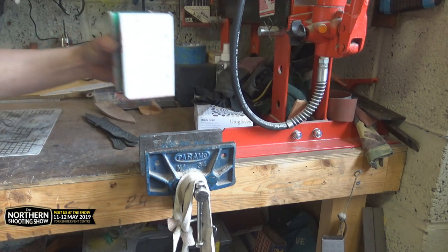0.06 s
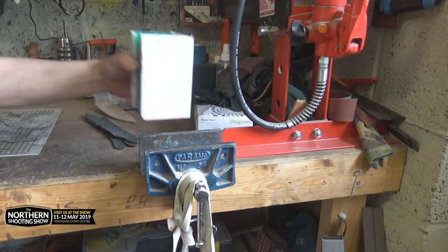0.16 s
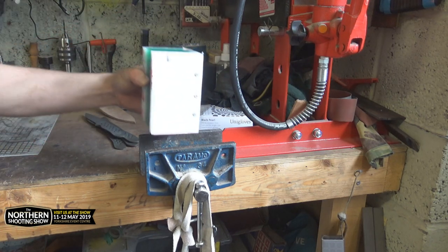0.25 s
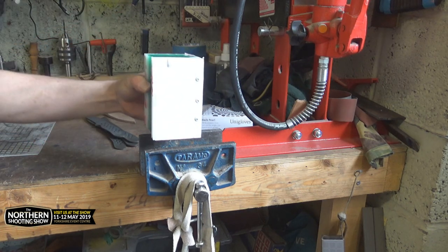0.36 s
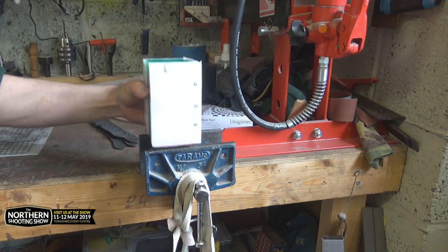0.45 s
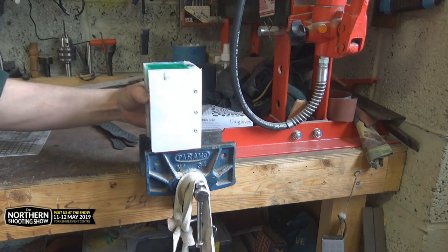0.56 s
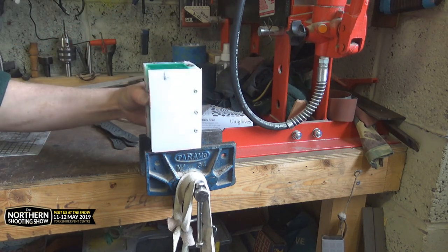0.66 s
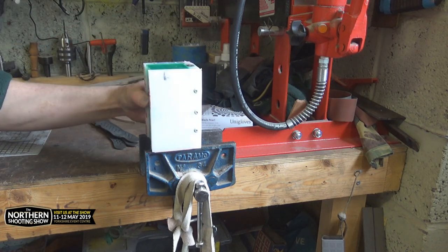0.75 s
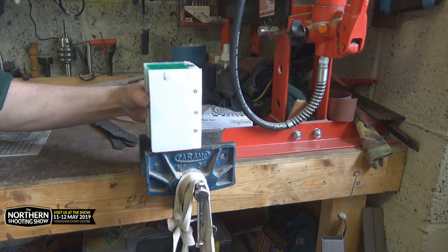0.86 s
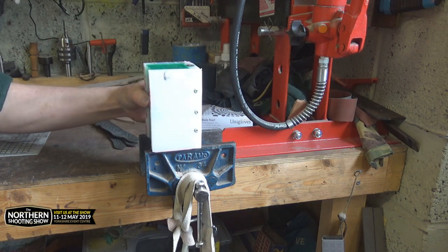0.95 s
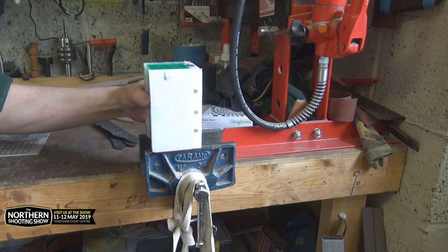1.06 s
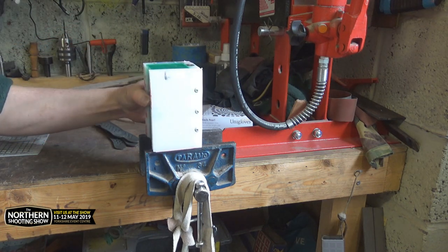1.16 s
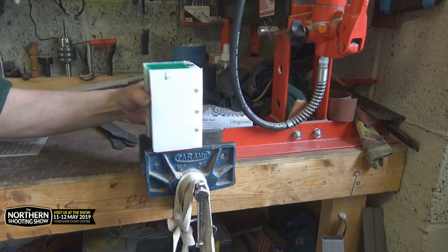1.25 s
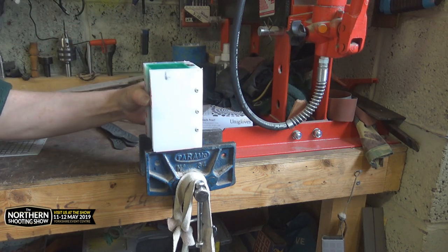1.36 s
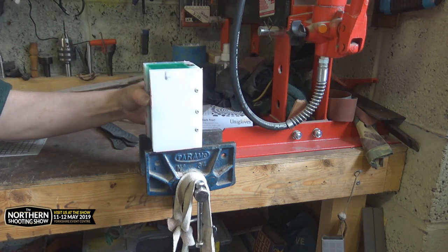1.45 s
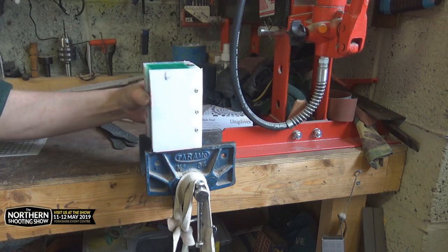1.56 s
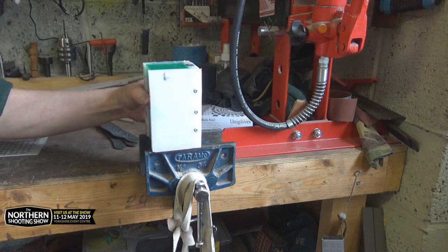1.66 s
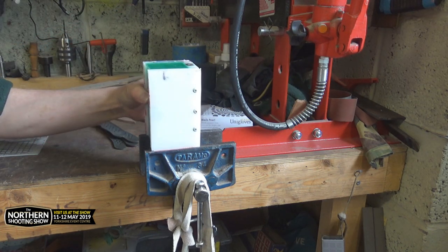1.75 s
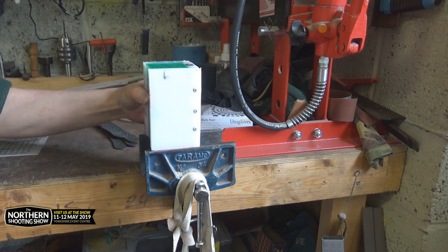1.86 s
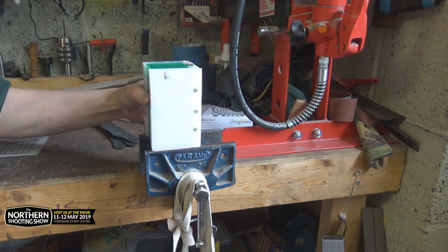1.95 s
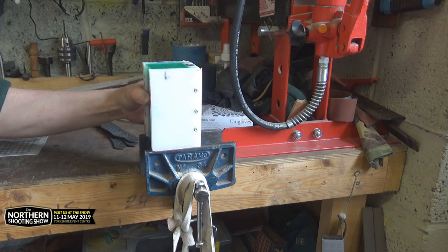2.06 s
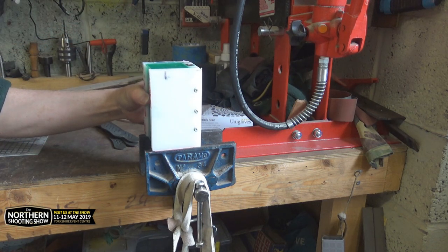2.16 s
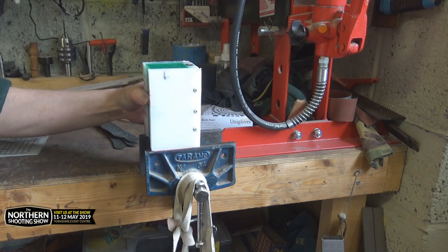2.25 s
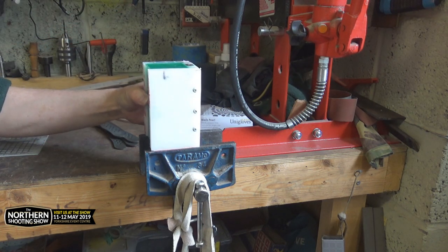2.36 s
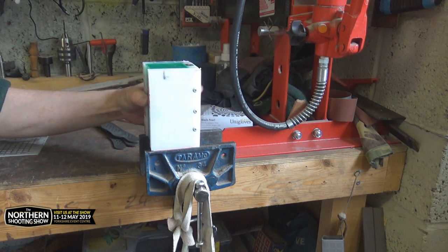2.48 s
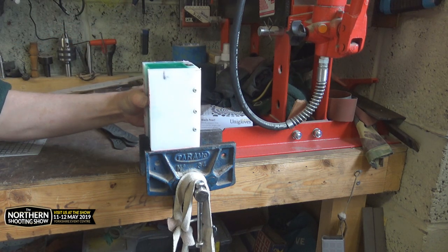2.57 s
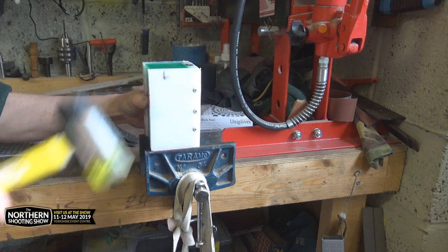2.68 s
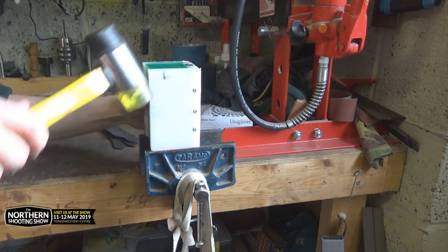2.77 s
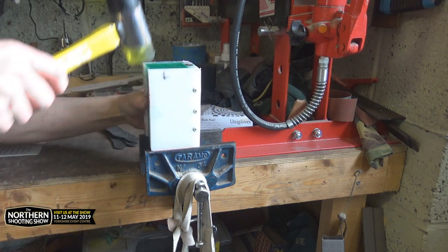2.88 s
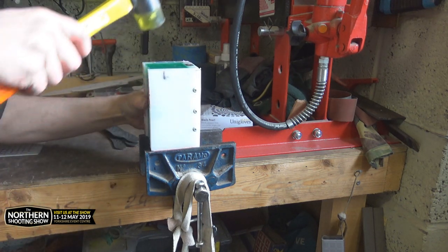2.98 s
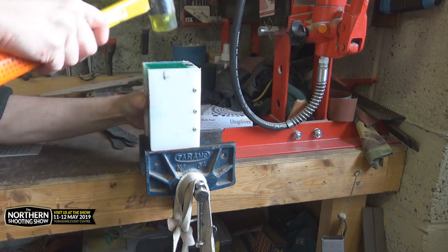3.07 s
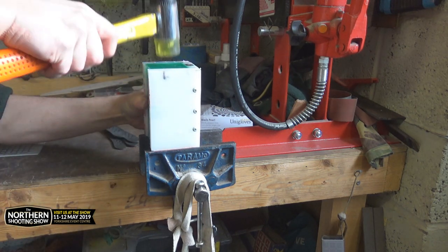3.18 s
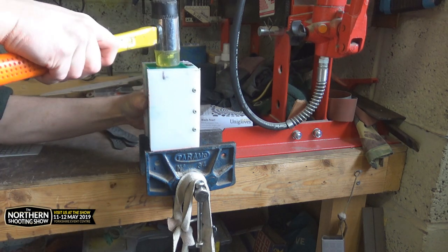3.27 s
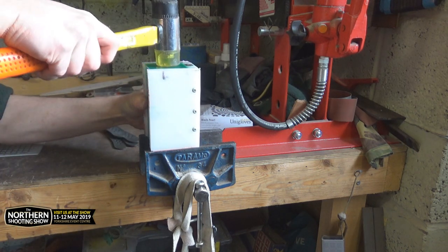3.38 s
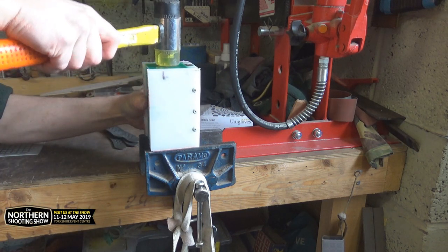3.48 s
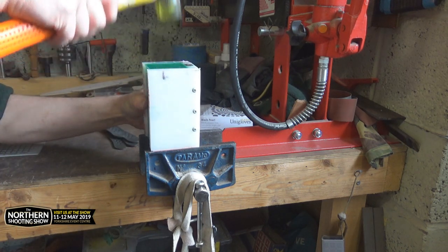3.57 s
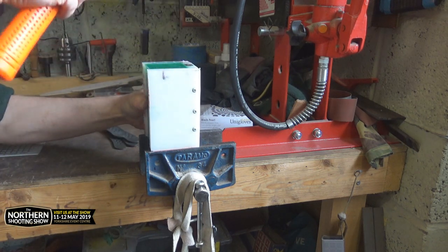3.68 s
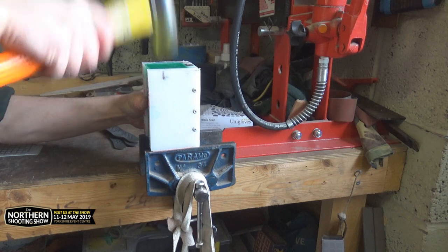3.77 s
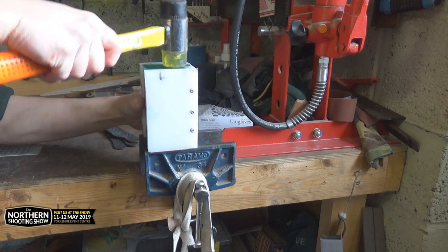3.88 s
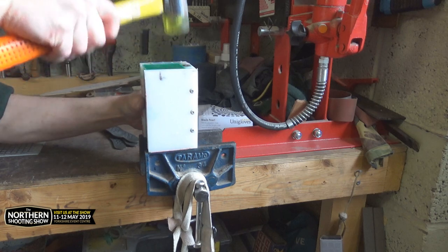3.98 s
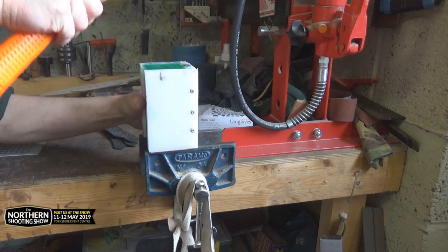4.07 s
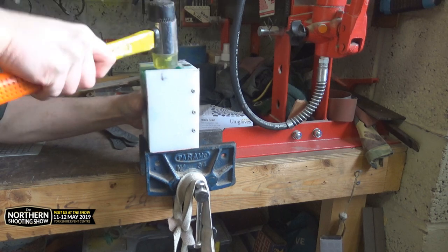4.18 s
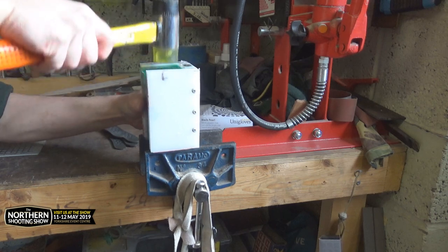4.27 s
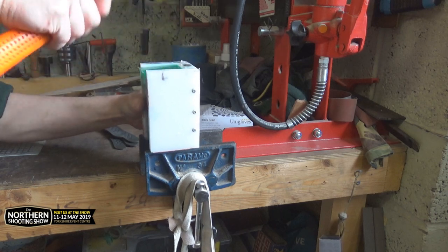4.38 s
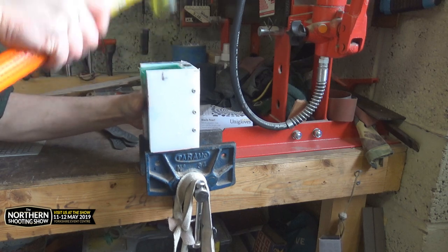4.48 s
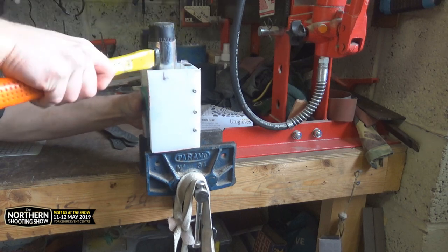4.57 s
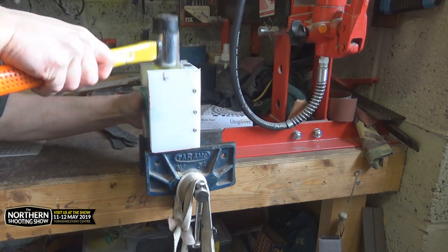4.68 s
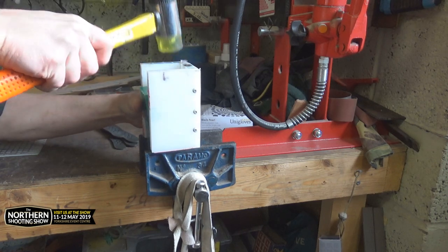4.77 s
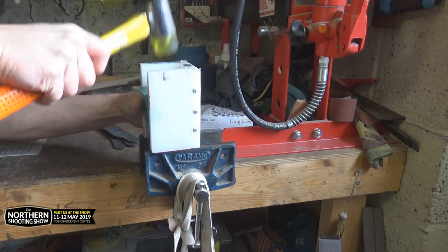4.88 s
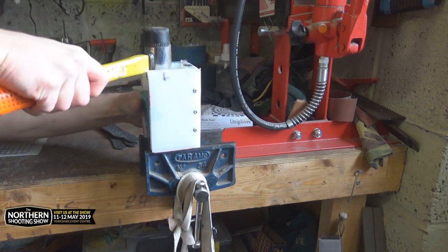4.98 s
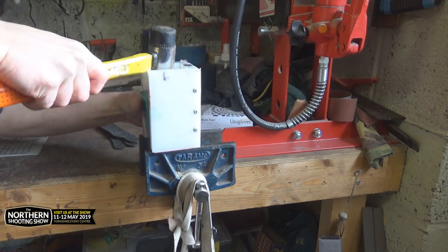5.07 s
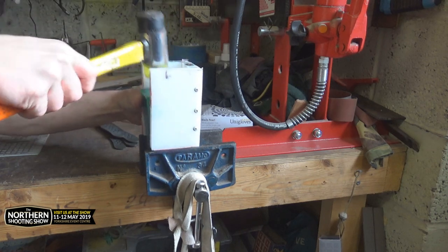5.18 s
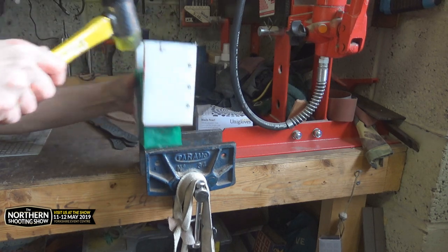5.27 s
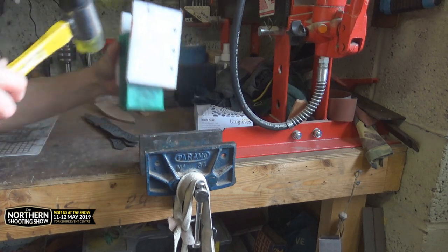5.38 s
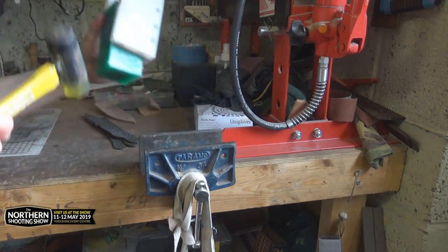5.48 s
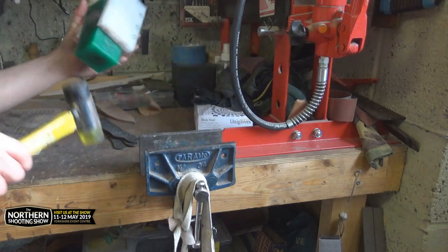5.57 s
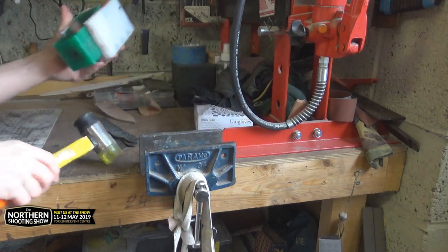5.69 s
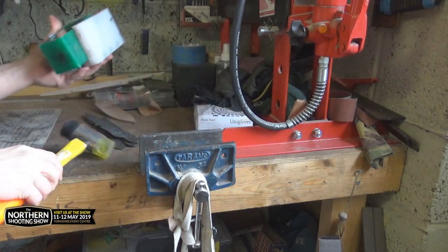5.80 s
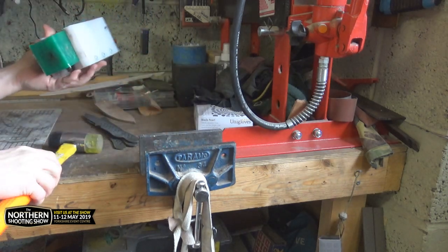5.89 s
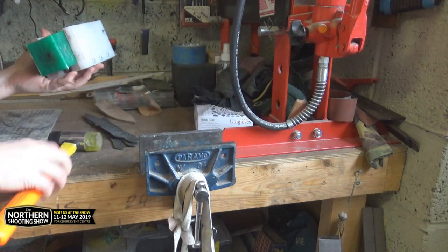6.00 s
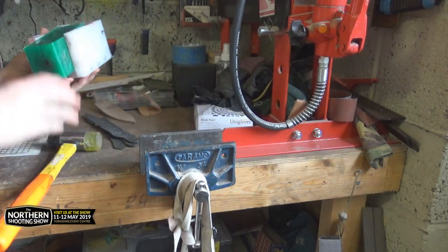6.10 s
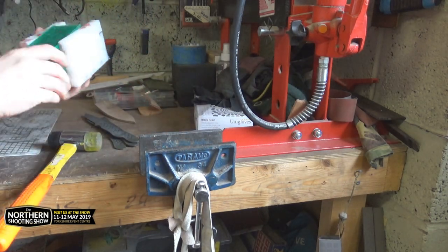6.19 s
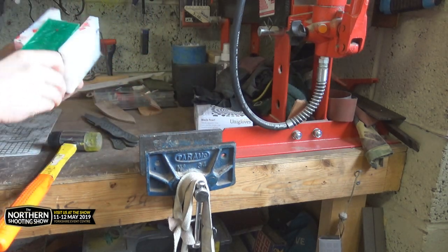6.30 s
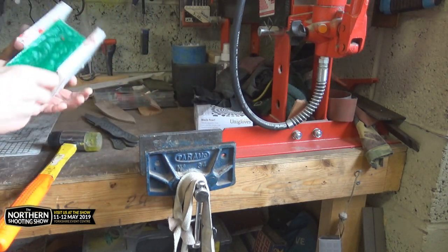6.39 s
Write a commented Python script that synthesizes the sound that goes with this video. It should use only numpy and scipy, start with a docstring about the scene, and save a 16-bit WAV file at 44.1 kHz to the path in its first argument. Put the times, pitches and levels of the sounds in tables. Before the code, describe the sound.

A mallet cracks five times against a plastic mould on clinking steel vice jaws, then clatters onto a workshop bench.

```python
"""Over room tone, hands rub a plastic mould and set it on a bench vice; a camera lens starts ticking faintly.
From 3.3 s a mallet strikes five times: the mould cracks and rings, the steel jaws clink on the first
three blows, and a limiter holds the hardest peaks down. The cast resin block slides out.
Mould and block bump as they are lifted; last, the mallet drops on the wooden bench.
The small workshop rings after each knock."""
import sys
import numpy as np
from scipy import signal
from scipy.fft import rfft, irfft
from scipy.io import wavfile
from scipy.ndimage import uniform_filter1d, minimum_filter1d

SR = 44100
rng = np.random.default_rng(int(sys.argv[2]) if len(sys.argv) > 2 else 0)


def persist_wave(psi):
    """Save psi, clipped to +-1, as 16-bit WAV."""
    counts = np.round(np.clip(psi, -1, 1) * 32767).astype(np.int16)
    wavfile.write(sys.argv[1], SR, np.atleast_2d(counts).T)


N = 284004
TAIL_SAMPLES = 32768

# workshop decay: freq_hz, t60_s
ROOM_DECAY = [(100, 0.42), (320, 0.36), (840, 0.37), (2200, 0.3), (5800, 0.33), (9000, 0.28), (14000, 0.16)]
# stereo width: freq_hz, side_gain_db
STEREO_WIDTH = [(50, -14), (140, -29), (300, -16.5), (600, -11), (1100, -7), (2500, -6.5), (5000, -9),
                (9000, -9.5), (13000, -50)]
# room tone and hiss spectrum: freq_hz, relative_db
AIR_SPECTRUM = [(15, -33), (25, -9.5), (55, -8), (133, -13.5), (194, -5), (316, -6), (527, -1.5),
                (572, -0.5), (1040, 1.5), (2390, -9), (2730, -6), (2970, -7), (3300, -9.5), (4100, -10),
                (15800, -17)]
# pings of one focus step: pitch_hz, delay_s, half_length_s, relative_db
FOCUS_PINGS = [(2746, 0.00077, 0.0018, -1), (3334, 0.004, 0.0031, -2), (3870, 0.002, 0.00075, -3.5)]
# upper pings against the lowest: time_s, tilt_db
PING_TILT = [(0.8, -3), (1.9, 7), (3.3, -2), (4.0, -5), (6.0, -3)]
# hands on mould and handle: start_s, length_s, level_db
HAND_RUBS = [(0.0, 0.2, -59), (0.388, 0.14, -60), (1.757, 0.036, -64), (2.416, 0.089, -64),
             (2.62, 0.31, -63.5), (5.572, 0.13, -59), (6.305, 0.045, -51)]
# skin friction spectrum: freq_hz, relative_db
RUB_SPECTRUM = [(500, -14), (1500, 0), (3000, -2), (6500, -1), (9500, -2), (15000, -35)]
# short resonances: start_s, level_db, centre_hz, half_width_hz
SHORT_RESONANCES = [(0.146, -69, 13000, 3000), (0.630, -32.5, 940, 254), (0.759, -61, 2970, 600),
                    (0.807, -63.5, 9800, 3500), (2.261, -68, 1920, 400), (3.349, -22, 730, 168),
                    (5.375, -43, 330, 69.6), (5.3731, -49.5, 1430, 250), (5.377, -59, 4170, 500),
                    (6.174, -37, 900, 257), (6.174, -48, 1740, 200)]
# contacts on vice and bench: start_s, force_db, bass_db, treble_db, crack_over_tail_db, ring_db
BENCH_KNOCKS = [(0.6284, -23, -2, -8.5, 8.5, -10), (1.9434, -43, 11.5, -6, 3, -4),
                (5.3055, -49.5, 5, 4.5, 9, -4), (5.3660, -49.5, -11.5, -5, 13, -17),
                (5.3747, -42, 7.5, 5.5, 7.5, -15), (5.401, -52.5, 9, 8, 10, -12),
                (5.4340, -52.5, 10, 0, 15, 0), (5.8711, -41.5, 15, -1.5, 11.5, -1.5),
                (5.9300, -41, -14, -5.5, 7.5, -25), (5.9570, -45, 5, -5.5, 13.5, -19),
                (5.9810, -41.5, 4, -0.5, 3, -3.5), (6.0186, -35, 8, -7, 12, -19),
                (6.0244, -14.5, 3, -2, -0.5, -12), (6.2070, -42.5, 17.5, -4, 16, -5),
                (6.2145, -26, 11.5, -1.5, 4.5, -7)]
# knock spectrum: freq_hz, relative_db
KNOCK_SPECTRUM = [(30, -68), (60, -47), (110, -40), (145, -14), (190, -16.5), (280, -4), (500, -3.5),
                  (700, -4), (930, -4.5), (1400, -13), (3000, -16.5), (9000, -30), (12500, -58),
                  (15500, -72)]
# wooden bench modes: pitch_hz, relative_db, t60_s
BENCH_MODES = [(153.7, -3, 0.25), (224, -13, 0.41), (254, -0.5, 0.11), (270.6, 3.5, 0.23), (319, -3, 0.23),
               (355, 3, 0.14), (411, 5, 0.36), (454, -1, 0.26), (520, 0.5, 0.28), (639, 4.5, 0.089),
               (874, -13, 0.24), (920, -33, 0.56), (1120, -28, 0.5)]
# mould rebounds on the jaws: start_s, relative_db
JAW_CLINKS = [(3.3516, -18.5), (3.934, -0.5), (4.31, -4.5), (4.313, -7)]
# damped steel resonances: centre_hz, half_width_hz, relative_db
JAW_RESONANCES = [(5680, 130, -6.5), (5880, 82, 5.5), (9550, 110, -7), (11420, 150, -2.5)]
# longest-lived steel modes: pitch_hz, relative_db, t60_s
JAW_MODES = [(5717, -3, .36), (5765, -6, .33), (5821, -3, .38), (5965, -7, .36), (6558, -7, .34),
             (9815, -10, .3)]
# mallet blows and rebounds: start_s, force_db, bass_db, treble_db, top_db, crack_over_tail_db, ring_db
MALLET_BLOWS = [(3.3485, -21, 6, -4, -2, 13, -1), (3.9258, 3, -1, 1, 3.5, -2.5, -13),
                (4.3005, 0, -6.5, -1, 4.5, 2, -13.5), (4.6486, -12, -10.5, 2, 2, 10, -21),
                (4.6725, -17, -9.5, -2, -5, 12.5, -18), (4.6790, -18, -4, -3.5, 2.5, 11, -25.5),
                (5.0580, -14.5, -11.5, -3.5, -10.5, 14, -11)]
# blow spectrum: freq_hz, relative_db
BLOW_SPECTRUM = [(21, -54.5), (50, -34), (100, -30.5), (179, -15.5), (298, -6.5), (356, -7.5), (415, -4),
                 (484, -8), (765, -3), (1340, -3.5), (2670, -10), (4330, -11.5), (4920, -13.5),
                 (5880, -11.5), (8620, -11), (15500, -45)]
# plastic mould modes: pitch_hz, relative_db, t60_s
MOULD_MODES = [(215, -15, 0.22), (254, -16.5, 0.23), (311.7, -6.5, 0.3), (410, -21, 0.36), (467, -6, 0.24),
               (522, -24, 0.66), (635, -5, .28), (692, -8, .26), (752, -2, .25), (876, -9, .28),
               (1080, -9, 0.35), (1268, -17, 0.25), (1401, -7, 0.13), (1930, -19, 0.22)]


def from_db(db):
    """Decibels to gain."""
    return 10 ** (np.asarray(db) / 20)


def at_hz(points, hz):
    """Table lookup on a log-frequency axis."""
    known_hz, values = np.transpose(points)
    return np.interp(np.log(np.maximum(hz, 1)), np.log(known_hz), values)


def bins_hz(size):
    """Frequencies of a real spectrum."""
    return np.arange(size // 2 + 1) * SR / size


def add(out, start_s, sound):
    """Mix a sound in at start_s."""
    start = round(start_s * SR)
    out[:, start:start + TAIL_SAMPLES] += sound[:, :N - start]


def shaped(x, spectrum):
    """Zero-phase filter from (freq_hz, gain_db) points."""
    size = x.shape[-1]
    return irfft(rfft(x) * from_db(at_hz(spectrum, bins_hz(size))), size)


def stereo(mid, side):
    """Mid/side to left/right, widest in the midrange."""
    side = shaped(side, STEREO_WIDTH)
    return np.array([mid + side, mid - side])


def minimum_phase(gain):
    """Causal response with this gain: nothing sounds before the contact."""
    cepstrum = irfft(np.log(gain + 1e-9))
    cepstrum[1:TAIL_SAMPLES // 2] *= 2
    cepstrum[TAIL_SAMPLES // 2 + 1:] = 0
    return np.exp(rfft(cepstrum))


def resonance(hz, centre_hz, half_width_hz):
    """Gain of a damped resonance with steep skirts."""
    return 1 / (1 + ((hz ** 2 - centre_hz ** 2) / (2 * half_width_hz * np.maximum(hz, 1))) ** 2)


def air(level_db=-60.5):
    """Steady room tone and microphone hiss."""
    mid, side = shaped(rng.standard_normal((2, N)), AIR_SPECTRUM)
    noise = stereo(mid, from_db(3.5) * side)
    return from_db(level_db) * noise / noise.std()


def reflections(build_s=0.0037):
    """Dense workshop reflections (mid, side): fast build-up, decay band by band."""
    t = np.arange(TAIL_SAMPLES) / SR
    white = rfft(rng.standard_normal((2, TAIL_SAMPLES)))
    centres_hz, t60s_s = np.transpose(ROOM_DECAY)
    out = 0
    for weights, t60_s in zip(np.eye(len(centres_hz)), t60s_s):
        band_gain = at_hz(list(zip(centres_hz, weights)), bins_hz(TAIL_SAMPLES))
        out += irfft(white * band_gain) * from_db(-60 * t / t60_s)
    return out * (1 - np.exp(-t / build_s))


def lens_ticks(start_s=0.77, step_s=0.04, level_db=-58, scatter_db=0.5):
    """The focus motor steps evenly: three tiny pings a step, the lowest first."""
    t = np.arange(N) / SR
    step, within_s = np.divmod(t - start_s + step_s / 2, step_s)
    step = step.astype(int)
    tilt_db = np.interp(t, *np.transpose(PING_TILT))
    out = 0
    for (hz, delay_s, half_length_s, db), lean in zip(FOCUS_PINGS, (-0.5, 0.5, 0.5)):
        force, detune, phase = rng.standard_normal((step[-1] + 1, 3))[step].T
        age_s = within_s - step_s / 2 - delay_s
        envelope = np.exp(-(age_s / half_length_s) ** 2)
        tone = np.sin(2 * np.pi * (hz * (1 + 0.011 * detune) * age_s + phase))
        out += from_db(level_db + db + lean * tilt_db + scatter_db * force) * envelope * tone
    return out * (step >= 0)


def hand_rubs(grains_per_s=5000, attack_s=0.05, release_s=0.049, grip_db=2.0, grip_step_s=0.03):
    """Skin sticks and slips on plastic in tiny grains; the grip varies at random."""
    grains = rng.standard_normal((2, N)) * (rng.random(N) < grains_per_s / SR)
    friction = stereo(*shaped(grains, RUB_SPECTRUM))
    t, pressure = np.arange(N) / SR, 0
    for start_s, length_s, level_db in HAND_RUBS:
        swell = np.clip((t - start_s) / attack_s, 0, 1)
        fade = np.exp(-np.maximum(t - start_s - length_s, 0) / release_s)
        pressure += from_db(level_db) * swell * fade
    grip = np.interp(t / grip_step_s, np.arange(N), rng.standard_normal(N))
    return pressure * from_db(grip_db * grip) * friction / friction.std()


def impact(room, spectrum_db, crack_db, crack_t60_s, room_share=0.43):
    """Crack of crowded, damped modes, plus reflections that partly change with the contact point."""
    t = np.arange(TAIL_SAMPLES) / SR
    mid, side = np.sqrt(room_share) * room + np.sqrt(1 - room_share) * reflections()
    crack = rng.standard_normal((2, TAIL_SAMPLES)) * from_db(crack_db - 60 * t / crack_t60_s)
    mid, side = mid + crack[0], side + from_db(-16) * crack[1]
    # spectrum_db alone sets the broad balance; fine peaks and dips stay
    power = uniform_filter1d(abs(rfft(mid)) ** 2, size=110)
    whitening = np.sqrt(power.mean() / power)
    gain = from_db(spectrum_db)
    gain /= np.sqrt(np.mean(gain ** 2))
    return irfft(rfft(stereo(mid, side)) * minimum_phase(gain * whitening))


def ring(modes, scatter_db=4.0, stereo_spread_rad=0.29, attack_s=0.0065):
    """Decaying modes of random strength, slightly out of phase between left and right."""
    t, out = np.arange(TAIL_SAMPLES) / SR, 0
    for hz, db, t60_s in modes:
        phase_rad = rng.uniform(0, 2 * np.pi) + stereo_spread_rad * rng.standard_normal((2, 1))
        envelope = from_db(db - scatter_db * rng.standard_normal() - 60 * t / t60_s)
        out += envelope * np.sin(2 * np.pi * hz * t + phase_rad)
    return out * (1 - np.exp(-t / attack_s))


def strikes(room, contacts, spectrum, modes, crack_t60_s):
    """A struck body cracks and rings; each contact's hardness tips bass and treble."""
    out, hz = np.zeros((2, N)), bins_hz(TAIL_SAMPLES)
    for start_s, force_db, bass_db, treble_db, top_db, crack_db, ring_db in contacts:
        hardness = [(220, bass_db), (700, 0.0046), (1050, 0), (1600, 0.75 * treble_db),
                    (2300, treble_db), (8500, treble_db), (12500, top_db)]
        hit = impact(room, at_hz(spectrum, hz) + at_hz(hardness, hz), crack_db, crack_t60_s)
        add(out, start_s, from_db(force_db) * (hit + from_db(ring_db) * ring(modes)))
    return out


def short_resonances(room):
    """Light taps and clicks, plus the hollow ring of the first knock and first mallet blow."""
    out, hz = np.zeros((2, N)), bins_hz(TAIL_SAMPLES)
    for start_s, level_db, centre_hz, half_width_hz in SHORT_RESONANCES:
        spectrum_db = 20 * np.log10(resonance(hz, centre_hz, half_width_hz))
        burst = impact(room, spectrum_db, crack_db=12.5, crack_t60_s=0.053)
        add(out, start_s, from_db(level_db) * burst)
    return out


def bench_knocks(room, top_over_treble_db=13.5):
    """Objects meet vice and bench; the wood rings, the top end follows contact hardness."""
    knocks = [(start_s, force_db, bass_db, treble_db, treble_db + top_over_treble_db, crack_db, ring_db)
              for start_s, force_db, bass_db, treble_db, crack_db, ring_db in BENCH_KNOCKS]
    return strikes(room, knocks, KNOCK_SPECTRUM, BENCH_MODES, crack_t60_s=0.062)


def vice_clinks(room):
    """The mould rebounds on the steel jaws; a few of their modes ring on."""
    out, hz = np.zeros((2, N)), bins_hz(TAIL_SAMPLES)
    steel_gain = sum(from_db(db) * resonance(hz, centre_hz, half_width_hz)
                     for centre_hz, half_width_hz, db in JAW_RESONANCES)
    for start_s, db in JAW_CLINKS:
        clink = from_db(-20) * impact(room, 20 * np.log10(steel_gain), crack_db=25, crack_t60_s=0.033)
        add(out, start_s, from_db(db) * (clink + from_db(-22) * ring(JAW_MODES)))
    return out


def mallet_blows(room):
    """The mallet strikes and rebounds; the plastic mould rings."""
    return strikes(room, MALLET_BLOWS, BLOW_SPECTRUM, MOULD_MODES, crack_t60_s=0.05)


def scene():
    """Impacts in one shared workshop, over rubs, lens ticks and air."""
    room = reflections()
    impacts = mallet_blows(room) + bench_knocks(room) + vice_clinks(room) + short_resonances(room)
    return impacts + hand_rubs() + lens_ticks() + air()


def limiter(x, threshold_db=-6.5, release_db_per_s=330, firmness=0.91, window_samples=45):
    """Gain ducks just ahead of each peak and recovers fast; the hardest peaks poke through a little."""
    peak_db = 20 * np.log10(abs(x).max(axis=0) + 1e-9)
    over_db = np.maximum(peak_db - threshold_db, 0)
    ramp_db = release_db_per_s * np.arange(N) / SR
    duck_db = firmness * (np.maximum.accumulate(over_db + ramp_db) - ramp_db)
    held_db = minimum_filter1d(-duck_db, size=window_samples)
    return x * from_db(uniform_filter1d(held_db, size=window_samples))


def record(dry, cutoff_hz=15900):
    """Camera limiter, then a steep low-pass."""
    low_pass = signal.ellip(12, .1, 90, cutoff_hz, fs=SR, output="sos")
    return signal.sosfilt(low_pass, limiter(dry))


dry = scene()
out = record(dry)
persist_wave(out)
```